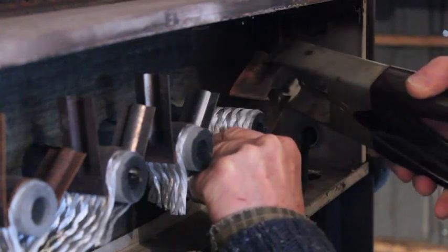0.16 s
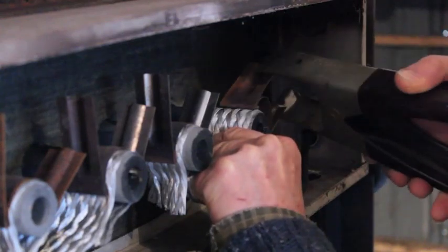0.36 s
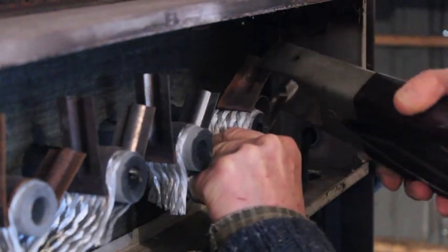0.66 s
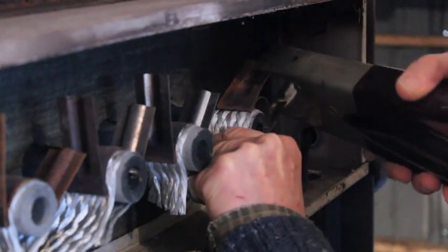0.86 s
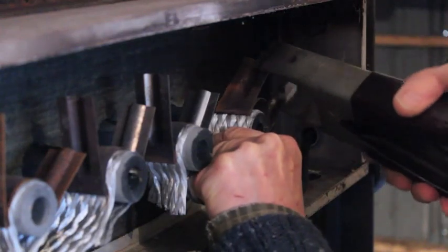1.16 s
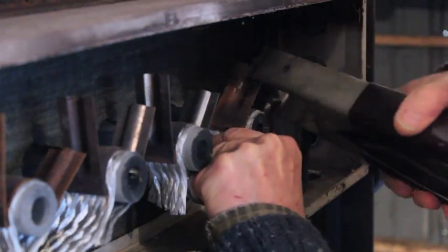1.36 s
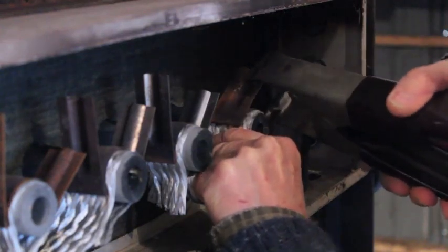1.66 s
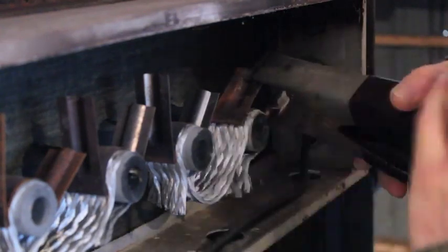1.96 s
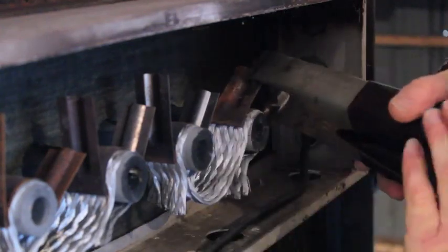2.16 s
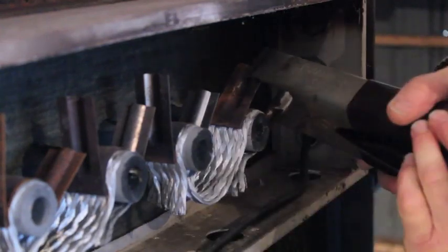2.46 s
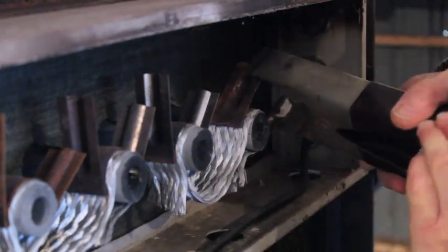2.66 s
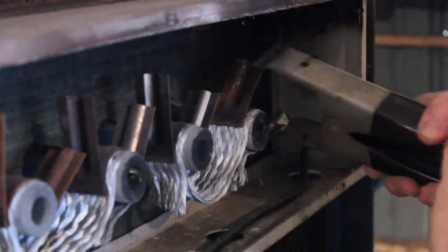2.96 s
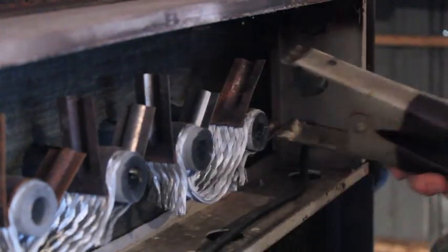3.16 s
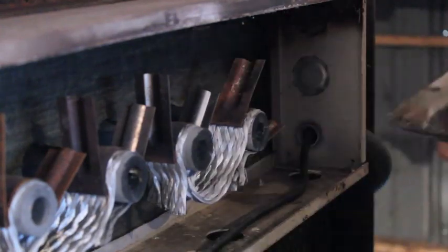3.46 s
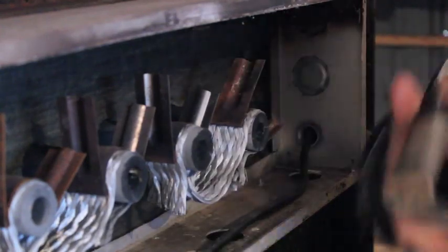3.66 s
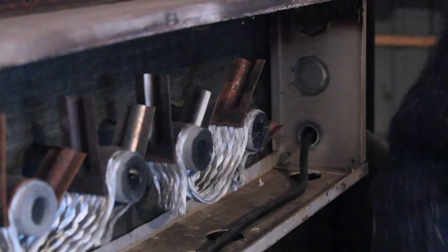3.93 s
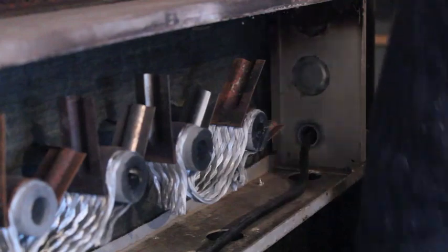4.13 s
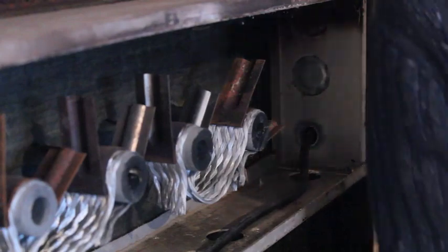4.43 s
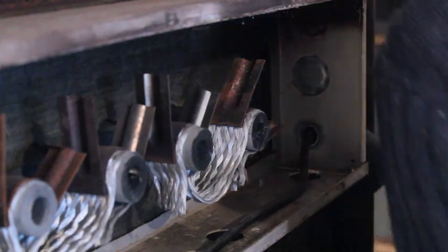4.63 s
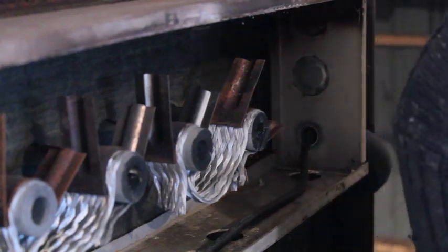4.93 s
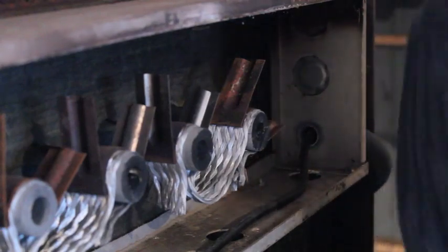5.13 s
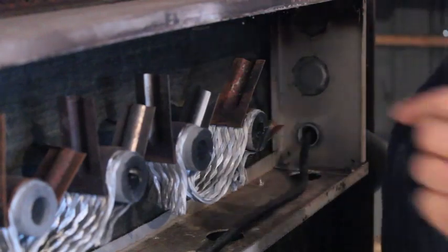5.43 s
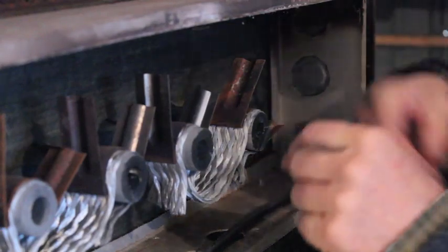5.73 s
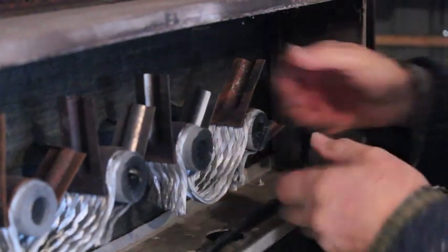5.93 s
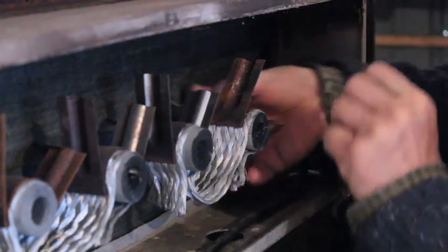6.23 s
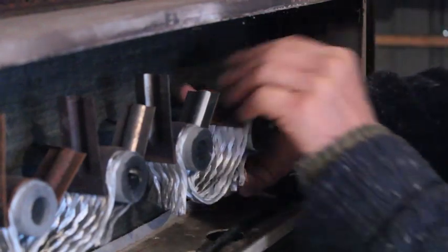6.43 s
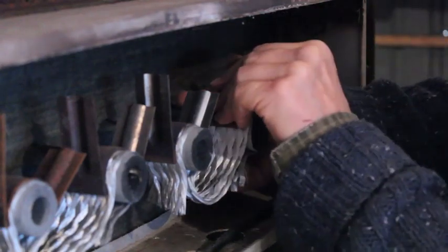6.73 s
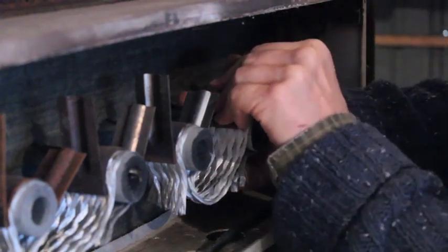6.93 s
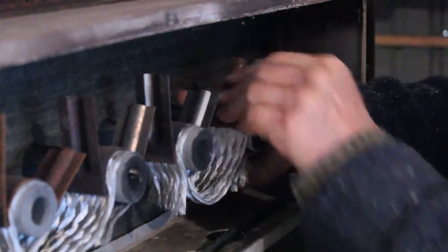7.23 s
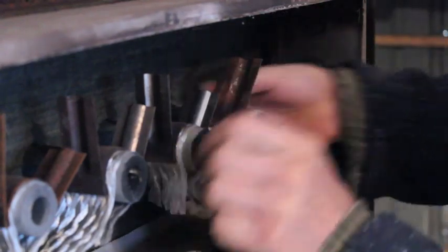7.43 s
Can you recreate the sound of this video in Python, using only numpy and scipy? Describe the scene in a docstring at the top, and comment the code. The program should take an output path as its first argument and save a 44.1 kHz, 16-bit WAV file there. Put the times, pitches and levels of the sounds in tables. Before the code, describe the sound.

In a quiet workshop a spring clamp slips, snaps hard on metal, creaks open and snaps again; a dull bench knock and tiny clip rattle follow.

```python
"""In a quiet workshop, a big spring clamp is worked over braided straps and metal clips in a steel cabinet.
Jaws slip and snap, the hinge creaks, cloth and metal scrape; the clamp is laid on a bench, and later
a small clip rattles home. Rubbing is random grains through resonances; blows ring damped modes behind a crack
of noise. The work moves from and to a small microphone, so its room tail comes and goes.
Microphone hiss and a faint, distant hum lie below."""
import sys
import numpy as np
from scipy import signal
from scipy.io import wavfile

SR = 44100
rng = np.random.default_rng(int(sys.argv[2]) if len(sys.argv) > 2 else 0)


def gain_from_decibels(decibels):
    """Convert decibel values to linear amplitude factors."""
    exponent = np.asarray(decibels, float) / 20
    return 10 ** exponent


def to_wav(s):
    """Save 16-bit WAV."""
    ch = np.atleast_2d(s).T  # columns
    pcm = np.round(np.clip(ch, -1, 1) * 32767)  # PCM
    wavfile.write(sys.argv[1], SR, pcm.astype(np.int16))


N = 334719  # samples

# colour of the microphone hiss: pitch_hz, relative_level_db
HISS_COLOUR = [(15, -39), (25, -9), (33, -11), (55, -4), (87, -23), (124, -15.5), (220, -3.5), (304, -5),
               (687, -3), (979, -3.5), (4020, -10), (15200, -18), (16500, -20)]
HISS_RMS_DB = -56.5
# two distant drones: time_s, low_drone_rms_db, upper_drone_rms_db
DRONE_LEVELS = [(0, -74.5, -74), (2.6, -76, -81.5), (2.9, -74, -72), (5.5, -79.5, -73.5), (7.59, -81, -70)]
# resonances that shape the drones, low one first: pitch_hz, width_hz
DRONE_RESONANCES = [(82, 38), (125, 32)]
# decay of the room: pitch_hz, t60_s
ROOM_DECAY = [(100, 0.24), (500, 0.33), (2000, 0.37), (5000, 0.38), (10000, 0.17), (16000, 0.22)]
# room heard as the work moves from and to the microphone: time_s, level_against_direct_db
ROOM_LEVELS = [(0, -12), (1.38, -14), (1.9, -10), (2.0, -4), (2.6, -19), (3.25, -2), (3.5, -12), (4.2, -10),
               (4.95, -7), (5.1, -10.5), (7.2, -15.5)]
MICROPHONE_LOW_HZ, MICROPHONE_HIGH_HZ = 143, 12240
CRACK_LOW_HZ = 634

# a small clip bounces to rest: start_s, relative_level_db
BOUNCES = [(7.2107, -12), (7.2125, -22), (7.2164, -15.5), (7.218, -10), (7.2273, -19), (7.2295, -16.5),
           (7.24, -23), (7.248, -32)]
# modes of the small clip: pitch_hz, relative_level_db, undamped_t60_s
SMALL_CLIP_MODES = [(2680, -27, 0.12), (4740, -33, 0.097), (5650, -11, 0.08), (6648, -17, 0.11),
                    (8100, -17, 0.085), (7800, -27, 0.099), (8920, -32, 0.17), (9100, -19, 0.075),
                    (9400, -16, 0.064), (10150, -2.5, 0.075), (11400, -10.5, 0.09), (13220, -14.5, 0.13),
                    (14860, -7, 0.09)]
# the clamp is laid on the bench: start_s, relative_level_db, hardness_hz
BENCH_KNOCKS = [(4.9483, -11, 1500), (4.952, -10, 2200), (5.0076, -10, 4000), (5.012, -12, 2800),
                (5.035, -9.5, 4500), (5.043, -15, 2500), (5.056, -20, 2500)]
# modes of the bench: pitch_hz, relative_level_db, undamped_t60_s
BENCH_MODES = [(77, -15, 0.47), (152, -19.5, 0.2), (253, -8.5, 0.25), (370, -13, 0.062), (424, -8, 0.12),
               (512, 4.5, 0.049), (598, 4.5, 0.04), (760, -3.5, 0.14), (870, -4.5, 0.16), (1009, -2.5, 0.1),
               (1147, -7, 0.17), (1412, 0.5, 0.047), (1637, -5.5, 0.05), (1850, -8.5, 0.07),
               (2134, -5, 0.06), (2275, 2, 0.025), (2650, -9, 0.06), (3023, -2, 0.052), (3510, -10, 0.044),
               (4000, -3.5, 0.027), (4730, -11, .04), (6000, -3.5, 0.026)]
# single parts set ringing: start_s, level_before_swell_db, pitch_hz, t60_s, rise_s
PART_PINGS = [(3.036, -38, 1030, 0.082, 0.0027), (3.065, -24.5, 4965, 0.19, 0.012),
              (3.085, -50, 12900, .12, .002), (3.449, -29, 1010, 0.12, 0.0011),
              (4.069, -47, 1650, 0.12, 0.0074), (4.113, -47, 800, .1, .003),
              (7.366, -44.5, 2020, 0.043, .002), (2.923, -30, 7800, 0.021, 0.0005),
              (7.226, -44, 360, 0.087, 0.0024), (2.86, -47, 1000, 0.27, 0.011),
              (0.0021, -34.5, 900, 0.037, 0.0016)]
# short ticks: start_s, ring_level_db, pitch_hz
SHORT_TICKS = [(0.679, -36, 5500), (.707, -33, 5500), (0.93, -32.5, 4400), (1.607, -34, 5200),
               (1.8895, -24, 1740), (1.96, -27, 2600), (1.8975, -22, 1890), (1.904, -20, 1640),
               (1.966, -16, 6850), (2.745, -38, 7600), (2.823, -33, 3140), (2.924, -23, 7800),
               (2.836, -41, 4900), (3.005, -31, 7600), (3.449, -24, 1880), (3.461, -23, 2500),
               (3.708, -35.5, 830), (3.741, -40, 780), (3.748, -30, 4140), (4.113, -34, 9000),
               (4.825, -33.5, 2200), (6.59, -42, 5800)]

# broad scrapes: top_s, rise_s, fall_s, level_db, centre_hz
BROAD_SCRAPES = [(1.79, .015, .08, -56.5, 2420), (1.968, 0.025, .065, -38.5, 3800),
                 (3.32, .05, .05, -56, 4600), (3.366, .004, 0.026, -40, 4300),
                 (3.385, .025, .05, -37, 4500), (3.506, .006, .05, -37.5, 3400),
                 (4.137, .004, .035, -42, 3200), (6.27, .04, .05, -63, 2950), (6.46, .05, .05, -62, 3000)]
# narrower rubs, gathered closely around one pitch region: top_s, rise_s, fall_s, level_db, centre_hz
NARROW_RUBS = [(1.896, .009, .03, -40, 1820), (3.185, .035, .04, -47, 5800), (3.228, .06, .05, -40.5, 5000),
               (3.44, .02, .025, -39, 4600), (3.46, .02, .04, -42, 2600), (5.788, .02, .045, -55, 2140)]
# scrapes along an edge that sings near one pitch: top_s, rise_s, fall_s, level_db, centre_hz
SINGING_EDGES = [(1.865, .025, .02, -52, 5500), (1.932, .005, .014, -38, 5790),
                 (4.168, .032, .03, -35, 4900), (4.2, .016, .035, -34.5, 5250),
                 (4.228, .03, .025, -41, 5060), (6.39, 0.14, .09, -57.5, 2370)]
# jaws and fingers slipping on the clips: top_s, rise_s, fall_s, level_db, centre_hz
CLIP_SLIPS = [(0.001, .01, .016, -47, 4000), (.42, .008, .018, -52.5, 4600), (.68, .006, .055, -50.5, 5350),
              (.85, .025, .08, -56, 5650), (.965, .02, 0.057, -53.5, 4230), (1.055, .012, .1, -58, 3960),
              (1.262, .055, .028, -48, 5600), (1.322, .05, .015, -58, 4300), (1.375, .026, .012, -47, 3400),
              (1.392, .013, .003, -31, 5300), (1.528, .015, .04, -52.5, 5200), (1.6, .07, .018, -55, 5200),
              (1.865, .05, .02, -54, 5440), (6.19, .13, 0.15, -57.5, 5200), (6.44, .12, .07, -60, 7200),
              (7.368, .085, .04, -56.5, 5850)]
# resonances of the thin clips: pitch_hz, width_hz, relative_level_db
CLIP_RESONANCES = [(880, 300, 18), (2120, 560, 10), (3080, 230, 1), (3630, 240, 6.5), (4400, 220, -14),
                   (5200, 320, 5.5), (6130, 310, 2), (7360, 160, 0), (8300, 250, -6), (9300, 200, -29),
                   (10470, 350, 8.5), (11970, 270, 2), (12800, 300, 3), (15200, 400, -4)]
# a stroke has lost this much one rise before and one fall after its top, on a curve that rounds the top
STROKE_EDGE_DB, STROKE_ROUNDING = 16, 1.9

# the hinge rasps as the clamp opens: top_s, rise_s, fall_s, level_db, centre_hz
HINGE_RASPS = [(2.58, .13, 0.18, -62, 6700), (2.84, .006, .018, -44, 4950), (2.87, .025, .025, -42, 4900),
               (2.902, .016, .04, -43, 7000), (2.97, .04, .08, -52, 8600), (3.078, .045, .013, -43, 4960)]
# resonances of the hinge: pitch_hz, width_hz, relative_level_db
HINGE_RESONANCES = [(862, 100, 5), (1750, 450, 2.5), (3120, 200, -9.5), (4850, 190, -4.5), (6000, 250, -11),
                    (6730, 250, -12), (7670, 220, -3.5), (8900, 200, -13), (9300, 210, -11),
                    (10800, 400, -12), (11900, 400, -18), (13300, 500, -8), (14700, 400, -4)]
# at first the hinge sticks and slips in single jolts; the spread is a share of the gap, either way
JOLTS_FROM_S, JOLTS_TO_S, JOLT_GAP_S, JOLT_GAP_SPREAD = 2.4917, 2.712, .0153, .3
JOLT_DB, JOLT_SPREAD_DB = -45, 1.5
# where a jolt excites the hinge best, and the loss away from there
JOLT_HZ, JOLT_FOCUS_DB_PER_OCTAVE = 8300, 16

# the clamp snaps against metal: start_s, relative_level_db, centre_hz, focus_db_per_octave, crack_level_db
CLAMP_SNAPS = [(1.3925, -24, 2500, 15, -20), (1.3939, -16.5, 1480, 12, -9), (1.3974, -35, 1510, 6, -9.5),
               (3.496, -9.5, 3900, 17, -7), (3.506, -29.5, 3000, 5.5, -16), (3.51, -35, 3700, -1, -15),
               (3.537, -41, 3700, 14, -27)]
# modes of the clamp: pitch_hz, relative_level_db, undamped_t60_s
CLAMP_MODES = [(982, 5, 0.065), (1197, 1.5, 0.063), (1380, -12, 0.051), (1617, 2, 0.031), (2000, -2, .03),
               (2192, 10, 0.033), (2500, -5, .03), (2900, -2.5, 0.041), (3290, -31, .03),
               (3790, 0.5, 0.061), (3910, -6.5, 0.068), (4300, -26, .025), (5150, -33, .03),
               (5700, -12, .03), (6700, -10, .025), (8300, 11, 0.013), (7900, -27, .04), (10600, 0, .02)]
# longest ring the gripping hand allows at 2.5 kHz, before the damping in struck()
GRIP_T60_S = .045
# cabinet panels that boom after the first snap: pitch_hz, level_db, undamped_t60_s
CABINET_MODES = [(84.6, -36, 0.54), (140, -43, 0.43), (241, -40, 0.29), (319.4, -37, 0.39),
                 (452, -37, 0.13), (519, -46.5, 0.22), (800, -37.5, 0.1), (960, -36.5, 0.075)]


def rms_one(x):
    """Scale to rms 1."""
    return x / np.sqrt(np.mean(x ** 2) + 1e-20)


def at_hz(points, hz):
    """Read a spectrum on a log frequency axis."""
    points_hz, values = np.transpose(points)
    return np.interp(np.log(hz), np.log(points_hz), values)


def near(hz, centre_hz, db_per_octave):
    """Gain that changes with the octaves from a centre: a positive slope falls, a negative one rises."""
    return gain_from_decibels(-db_per_octave * np.abs(np.log2(hz / centre_hz)))


def wander(t, per_s):
    """Slow chance: random knots of spread 1, joined by straight lines."""
    knots = rng.standard_normal(int(per_s * N / SR) + 2)
    return np.interp(t * per_s, np.arange(len(knots)), knots)


def bands(count, spacing):
    """Band-pass filters from 25 Hz up, spaced in octaves, with their centres."""
    edges = np.minimum(25 * 2 ** (spacing * np.arange(count + 1)), .45 * SR)
    return [(np.sqrt(low * high), signal.butter(2, [low, high], "band", fs=SR, output="sos"))
            for low, high in zip(edges, edges[1:])]


def ring(force, hz, t60):
    """A damped two-pole mode: a unit click sets a sine of height 1 ringing."""
    r = gain_from_decibels(-60 / (t60 * SR))
    w = 2 * np.pi * hz / SR
    return signal.lfilter([0, np.sin(w)], [1, -2 * r * np.cos(w), r * r], force + 1e-18)


def resonate(force, hz, width_hz):
    """A resonance that keeps the rms of white noise."""
    r = np.exp(-np.pi * width_hz / SR)
    poles = [1, -2 * r * np.cos(2 * np.pi * hz / SR), r * r]
    return signal.lfilter([1, 0, -1], poles, force + 1e-18) * np.sqrt((1 - r * r) / 2)


def grains(per_s, spread_db):
    """Random clicks of uneven size and either sign; rms 1 at any rate."""
    uneven = gain_from_decibels(spread_db * np.minimum(rng.exponential(1, N), 4))
    sizes = rms_one(uneven * rng.choice([-1, 1], N))
    return sizes * (rng.random(N) < per_s / SR) * np.sqrt(SR / per_s)


def strokes(kinds):
    """Level, centre, focus and hump at each sounding sample; where strokes overlap the stronger one leads."""
    power, mixed = np.zeros(N), np.zeros((3, N))
    for rows, focus, hump_db in kinds:
        for top, rise, fall, db, hz in rows:
            first, last = int((top - 2 * rise) * SR), int((top + 2 * fall) * SR)
            at = np.arange(max(first, 0), min(last, N))
            away = np.maximum((top - at / SR) / rise, (at / SR - top) / fall)
            stroke_power = gain_from_decibels(db - STROKE_EDGE_DB * away ** STROKE_ROUNDING) ** 2
            power[at] += stroke_power
            mixed[:, at] += np.outer([hz, focus, hump_db], stroke_power)
    at = np.flatnonzero(power)
    return at, np.sqrt(power), *(mixed[:, at] / power[at])


def rubbed(kinds, peaks, per_s, spread_db, dry_db, drift_db, hump_octaves=0.2):
    """Grains drive resonances near the centre, with a slow random drift in the strength of each resonance.
    The grains are heard a little by themselves.
    kinds: (strokes, focus in dB per octave, extra hump at the centre in dB)."""
    at, level, centre_hz, focus, hump_db = strokes(kinds)
    force = level * grains(per_s, spread_db)
    weights = []
    for hz, _, db in peaks:
        drift = drift_db * wander(at / SR, per_s=30)
        hump = hump_db * np.exp(-(np.log2(hz / centre_hz) / hump_octaves) ** 2)
        weights.append(gain_from_decibels(db + drift + hump) * near(hz, centre_hz, focus))
    total = np.sqrt(sum(w ** 2 for w in weights))
    out = gain_from_decibels(dry_db) * signal.lfilter([1, -1], [1, -.9], force)
    share = np.zeros(N)
    for (hz, width, _), weight in zip(peaks, weights):
        share[at] = force[at] * weight / total
        out += resonate(share, hz, max(width, 100))
    return out


def struck(times, strength, modes, contact_s, split=0.028, damping=0.74):
    """Each mode is three close neighbours; rough contact reaches each at a moment and strength of its own.
    contact_s is the mean delay; split is a share of the pitch; damping multiplies the t60 of each mode."""
    out = np.zeros(N)
    first, last = int(min(times) * SR), int(max(times) * SR) + SR // 2
    late = contact_s * 2 * rng.random((len(times), len(modes), 3))
    uneven_db = rng.normal(0, 2, late.shape)
    for k, (hz, db, t60) in enumerate(modes):
        for side in range(3):
            force = np.zeros(N)
            at = ((np.array(times) + late[:, k, side]) * SR).astype(int)
            force[at] = gain_from_decibels(db + uneven_db[:, k, side]) * strength(hz) * (-1) ** (k + side)
            side_hz = hz * (1 + split * (side - 1))
            out[first:last] += ring(force[first:last], side_hz, t60 * damping) / np.sqrt(3)
    return out


def cracks(times, levels_db, length_s):
    """A thin burst of noise at each contact, dying exponentially with time constant length_s."""
    force = np.zeros(N)
    force[(np.array(times) * SR).astype(int)] = gain_from_decibels(levels_db)
    envelope = signal.lfilter([1], [1, -np.exp(-1 / (length_s * SR))], force + 1e-18)
    burst = envelope * rng.standard_normal(N) / 2
    return signal.sosfilt(signal.butter(2, CRACK_LOW_HZ, "high", fs=SR, output="sos"), burst)


def floor():
    """Smooth microphone hiss from filtered noise, and two low, wavering drones from narrow resonances."""
    white = rng.standard_normal((2, N))
    # neighbouring bands take independent noise
    hiss = sum(gain_from_decibels(at_hz(HISS_COLOUR, hz)) * signal.sosfilt(sos, white[k % 2])
               for k, (hz, sos) in enumerate(bands(count=19, spacing=.5)))
    s, *levels_db = np.transpose(DRONE_LEVELS)
    hum = np.zeros(N)
    for db, mode in zip(levels_db, DRONE_RESONANCES):
        drone = resonate(resonate(rng.standard_normal(N), *mode), *mode)
        hum += gain_from_decibels(np.interp(np.arange(N) / SR, s, db)) * rms_one(drone)
    return gain_from_decibels(HISS_RMS_DB) * rms_one(hiss) + hum


def room(x):
    """A diffuse tail: noise that builds up in a few ms and dies band by band."""
    t = np.arange(SR // 2) / SR
    tail = sum(signal.sosfilt(sos, rng.standard_normal(len(t))) * gain_from_decibels(-60 * t / at_hz(ROOM_DECAY, hz))
               for hz, sos in bands(count=19, spacing=.5))
    tail = tail * (1 - np.exp(-t / 0.0032))
    sent = x * gain_from_decibels(np.interp(np.arange(N) / SR, *np.transpose(ROOM_LEVELS)))
    return signal.fftconvolve(sent, tail / np.sqrt(np.sum(tail ** 2)))[:N]


def rattle():
    """Each bounce of the small clip is a crack and a ring that the fingers damp at once."""
    s, db = np.transpose(BOUNCES)
    clink = struck(s, lambda hz: gain_from_decibels(db - 4.5), SMALL_CLIP_MODES, contact_s=0.00045, split=0.019, damping=0.15)
    return clink + cracks(s, db - 10.5, length_s=0.0014)


def bench():
    """A heavy contact rings the bench: modes above the hardness are reached less; a dull clatter joins it."""
    s, db, hard_hz = np.transpose(BENCH_KNOCKS)
    wood = struck(s, lambda hz: gain_from_decibels(db - 13.0) / np.sqrt(1 + (hz / hard_hz) ** 2), BENCH_MODES,
                  contact_s=.003, split=0.038, damping=0.56)
    clatter = signal.lfilter([.3], [1, -.7], cracks(s, db - 16.5, length_s=0.032))
    return wood + clatter


def pings():
    """Single parts ring in one mode each, swelling briefly and dying."""
    out = np.zeros(N)
    for s, db, hz, t60, rise in PART_PINGS:
        t = np.maximum(np.arange(N) / SR - s, 0)
        out += gain_from_decibels(db - 60 * t / t60) * (1 - np.exp(-t / rise)) * np.sin(2 * np.pi * hz * t)
    return out


def ticks():
    """A sharp edge with a few cycles of ring."""
    s, db, hz = np.transpose(SHORT_TICKS)
    out = cracks(s, db + 1., length_s=0.00028)
    t = np.arange(1500) / SR
    for start_s, level_db, pitch_hz in SHORT_TICKS:
        at = int(start_s * SR)
        out[at:at + len(t)] += gain_from_decibels(level_db) * np.sin(2 * np.pi * pitch_hz * t) * np.exp(-t * pitch_hz / 1.3)
    return out


def scrapes():
    """Cloth and metal scrape: dense grains into many broad, overlapping resonances."""
    peaks = [(hz, .12 * hz, 0) for hz in 300 * 1.17 ** np.arange(25)]
    kinds = [(BROAD_SCRAPES, 9, -2), (NARROW_RUBS, 17, 1), (SINGING_EDGES, 2.5, 19)]
    return rubbed(kinds, peaks, per_s=5300.0, spread_db=-0.5, dry_db=-31.0, drift_db=3.0)


def slips():
    """Short slips of grains make the thin clips sing."""
    return rubbed([(CLIP_SLIPS, 6.5, 0.1)], CLIP_RESONANCES,
                  per_s=3000., spread_db=1.0, dry_db=-11.0, drift_db=4.0)


def creak():
    """Single jolts ring the top modes of the hinge, quickly damped; then the slips crowd into a rasp."""
    regular = np.arange(JOLTS_FROM_S, JOLTS_TO_S, JOLT_GAP_S)
    early, strong = rng.uniform(-1, 1, (40, 2))[:len(regular)].T
    s = regular + JOLT_GAP_SPREAD * JOLT_GAP_S * early
    db = JOLT_DB + JOLT_SPREAD_DB * strong
    modes = [(hz, level_db, .018) for hz, _, level_db in HINGE_RESONANCES]
    jolts = struck(s, lambda hz: gain_from_decibels(db) * near(hz, JOLT_HZ, JOLT_FOCUS_DB_PER_OCTAVE), modes,
                   contact_s=0.000674, split=0.011)
    rasp = rubbed([(HINGE_RASPS, 4.5, 7)], HINGE_RESONANCES,
                  per_s=2300.0, spread_db=2.5, dry_db=-6.5, drift_db=1.0, hump_octaves=0.14)
    return jolts + cracks(s, db + 8.0, length_s=.0005) + rasp


def snaps():
    """Crack, ring of the hand-held clamp, and the boom of the cabinet that the first snap shakes."""
    s, db, centre_hz, focus, crack_db = np.transpose(CLAMP_SNAPS)
    # the grip allows high modes a shorter ring
    held = [(hz, level_db, min(t60, GRIP_T60_S * 2500 / hz)) for hz, level_db, t60 in CLAMP_MODES]
    clang = struck(s, lambda hz: gain_from_decibels(db - 7.0) * near(hz, centre_hz, focus), held,
                   contact_s=0.00053, split=0.042)
    boom = struck([1.398], lambda hz: 1, CABINET_MODES, contact_s=0.00797, split=0.07)
    return clang + cracks(s, crack_db, length_s=0.0011) + boom


def scene():
    """The work and its room tail as the small capsule hears them, weak at both ends, over the floor."""
    work = rattle() + bench() + pings() + ticks() + scrapes() + slips() + creak() + snaps()
    capsule = signal.butter(2, [MICROPHONE_LOW_HZ, MICROPHONE_HIGH_HZ], "band", fs=SR, output="sos")
    heard = signal.sosfilt(capsule, work + room(work))
    return (heard + floor())[None]


def band_limit(x):
    """A steep low-pass at the top of the band."""
    return signal.sosfilt(signal.butter(12, 17040, fs=SR, output="sos"), x)


def record(dry):
    """The top is cut steeply, 50 dB down from 17.3 kHz, and a small constant offset is added."""
    top_cut = signal.cheby2(10, 50, 17300, fs=SR, output="sos")
    finished = signal.sosfilt(top_cut, dry) + .0015
    return band_limit(finished)


dry = scene()
out = record(dry)
to_wav(out)
```